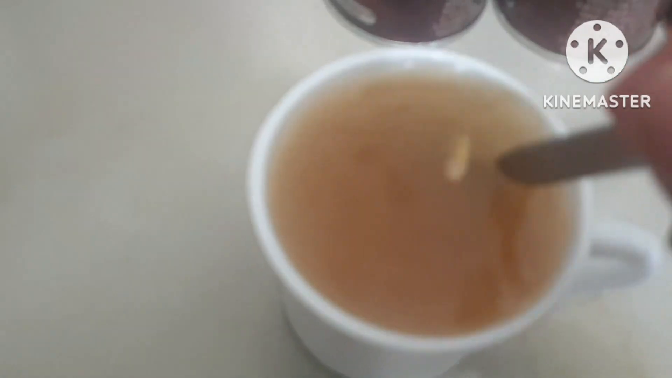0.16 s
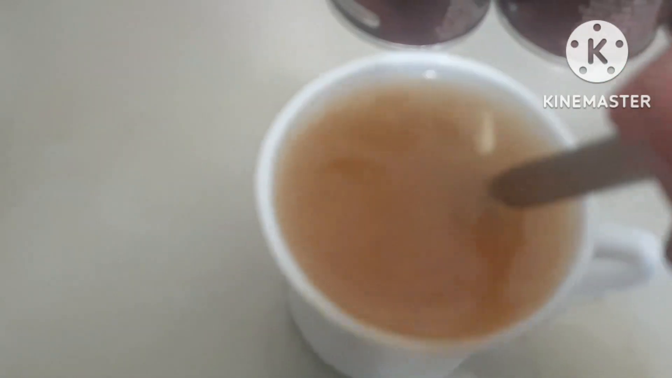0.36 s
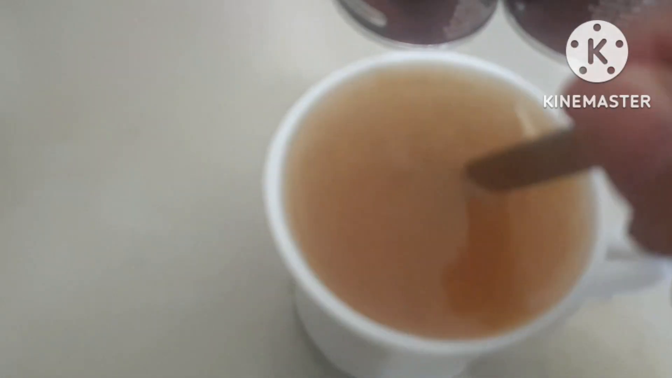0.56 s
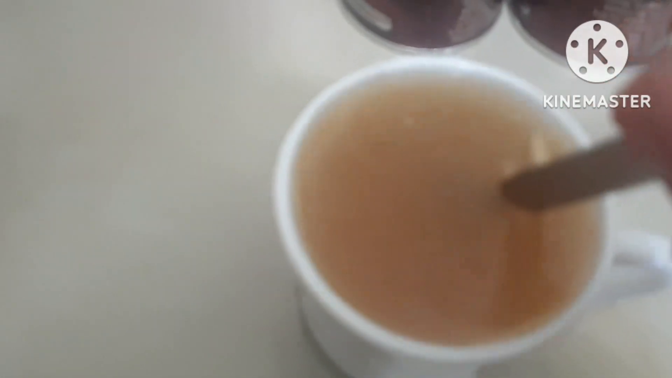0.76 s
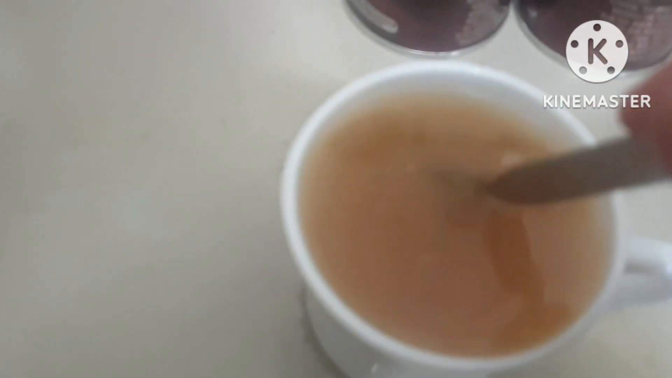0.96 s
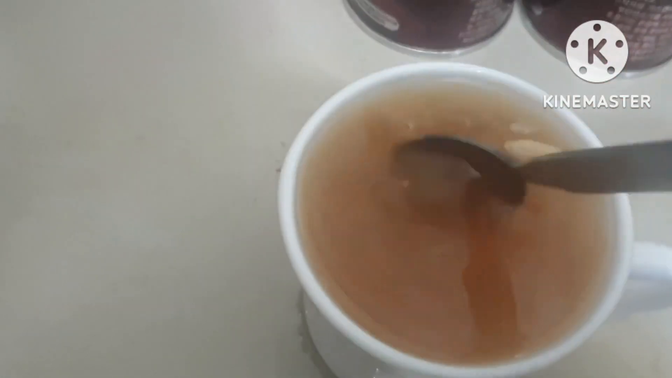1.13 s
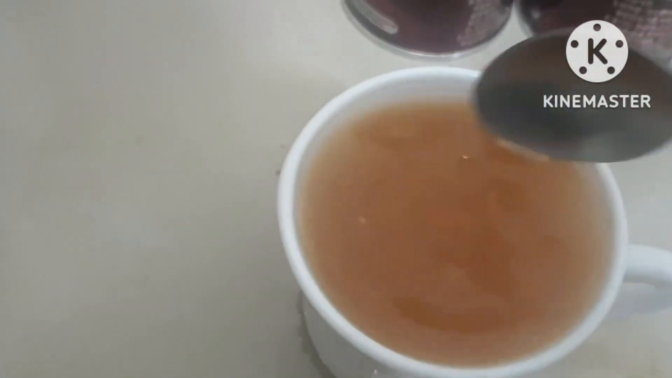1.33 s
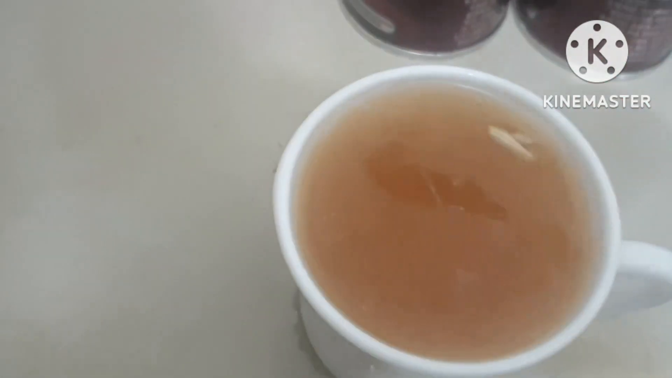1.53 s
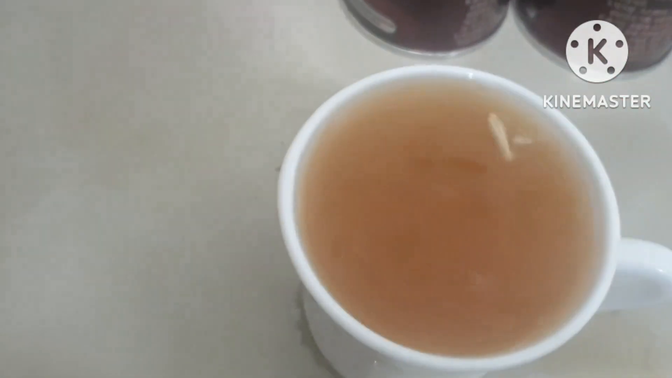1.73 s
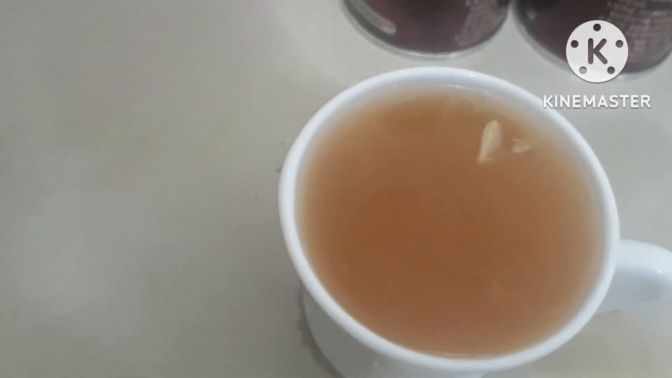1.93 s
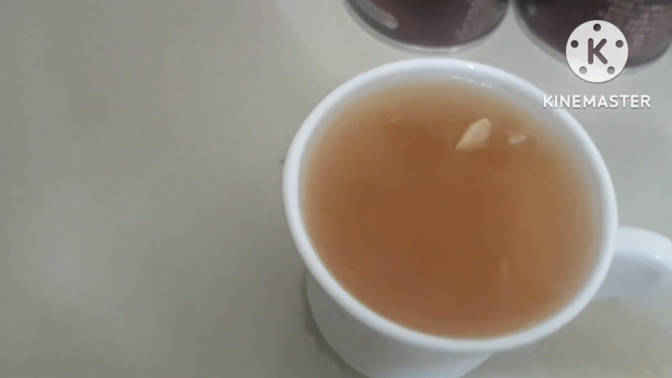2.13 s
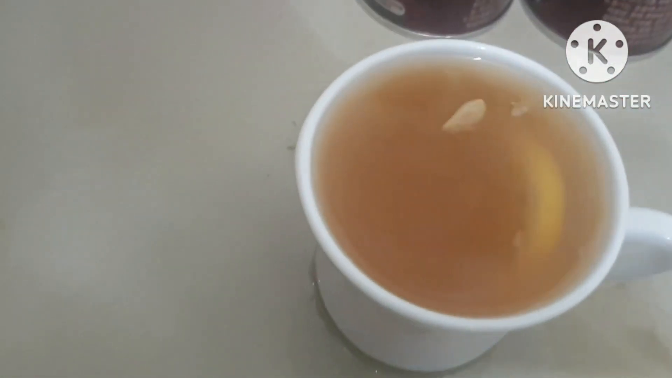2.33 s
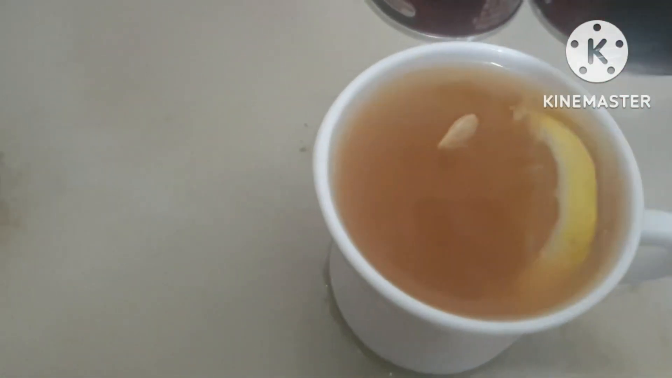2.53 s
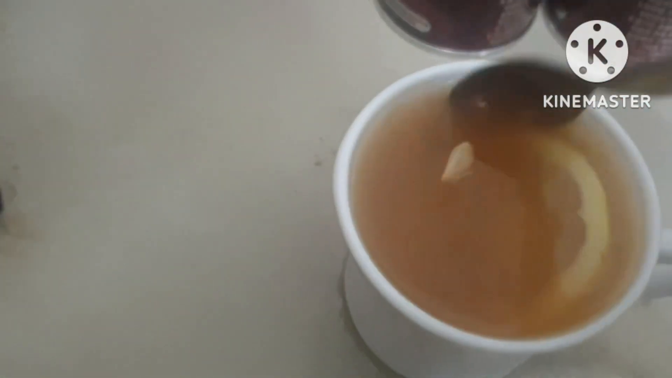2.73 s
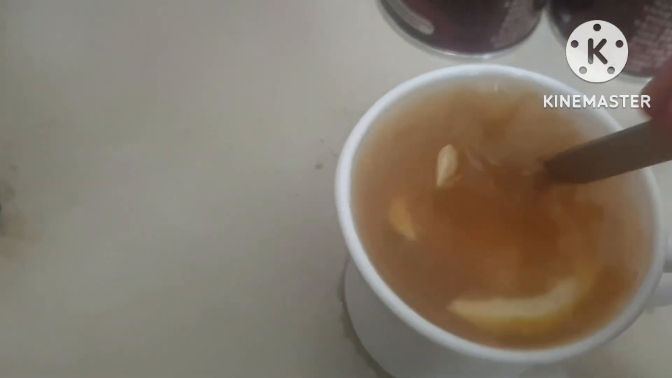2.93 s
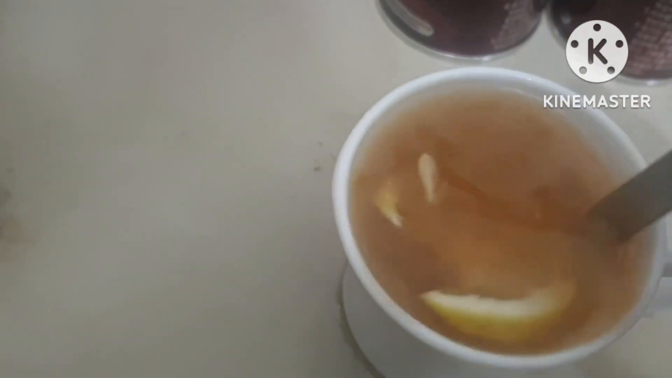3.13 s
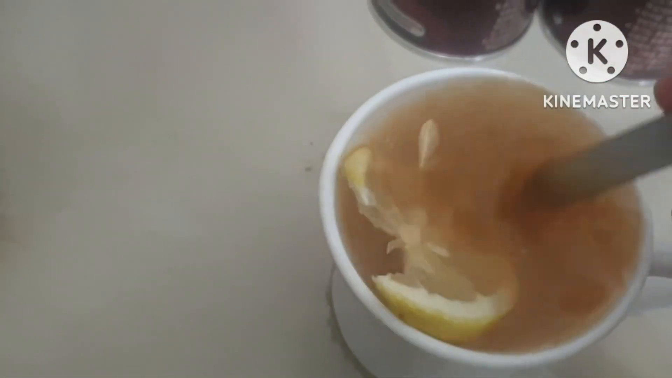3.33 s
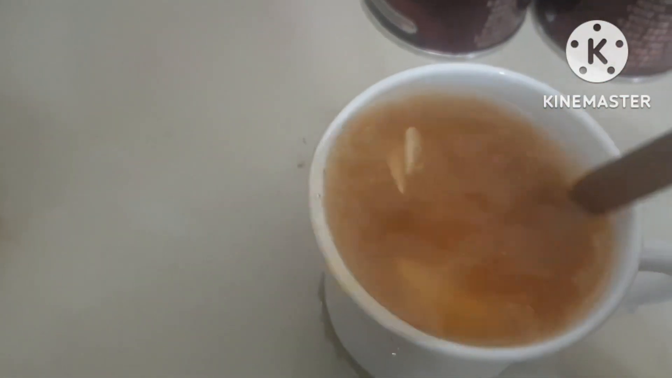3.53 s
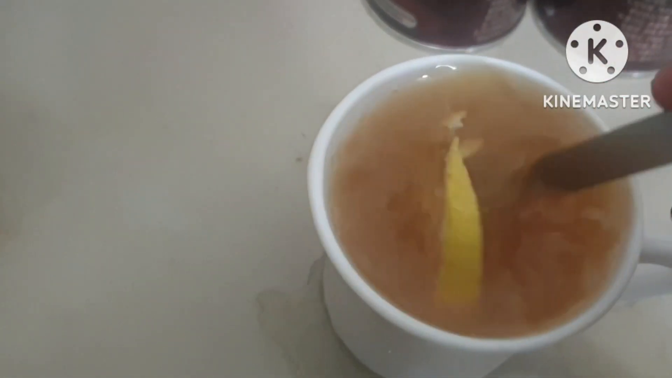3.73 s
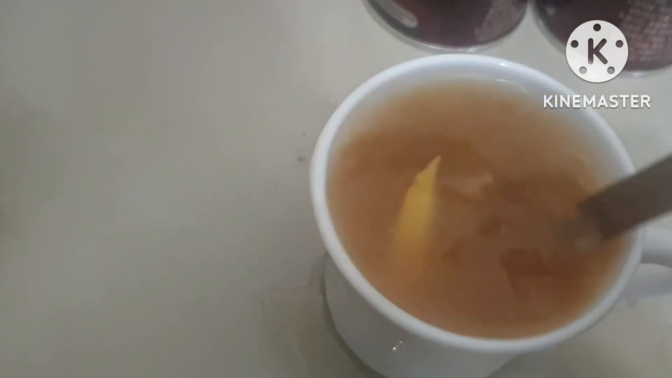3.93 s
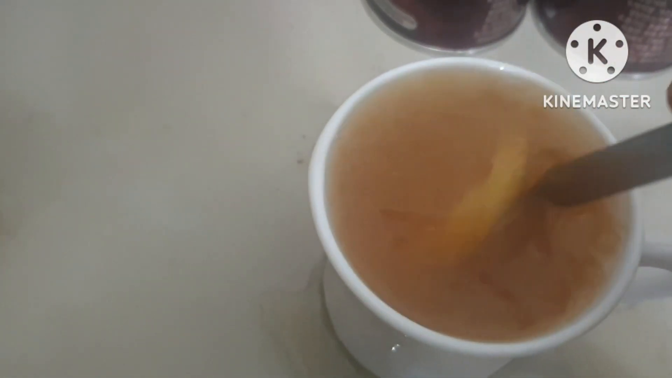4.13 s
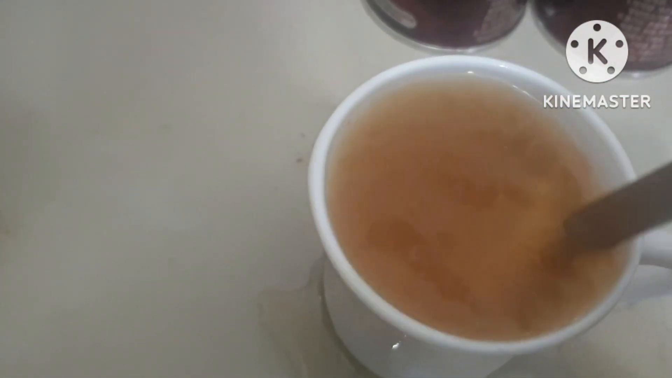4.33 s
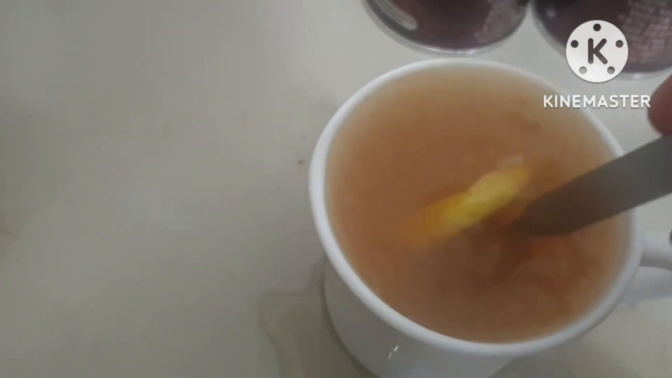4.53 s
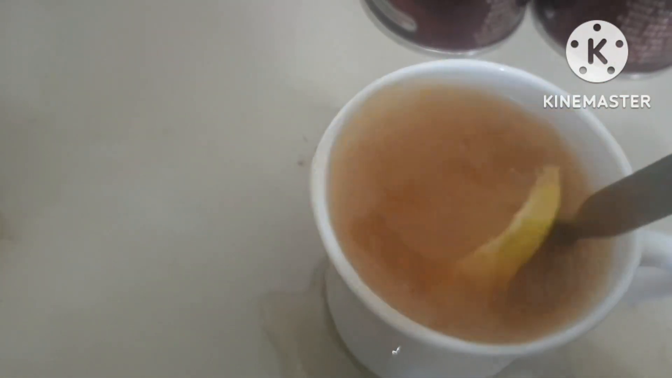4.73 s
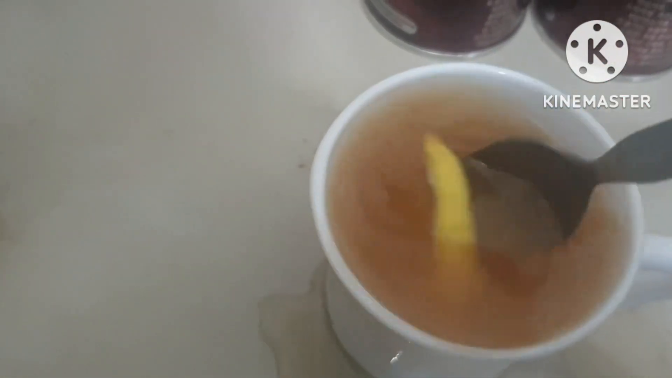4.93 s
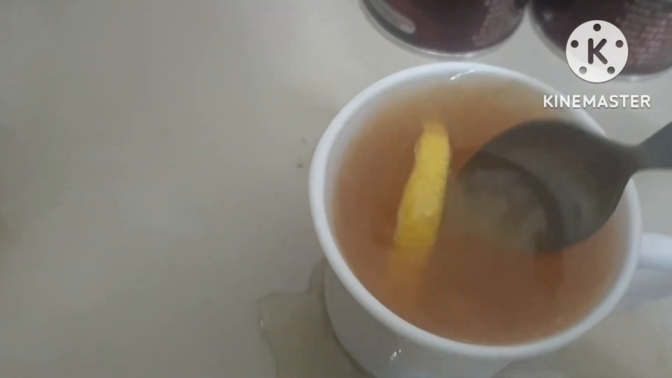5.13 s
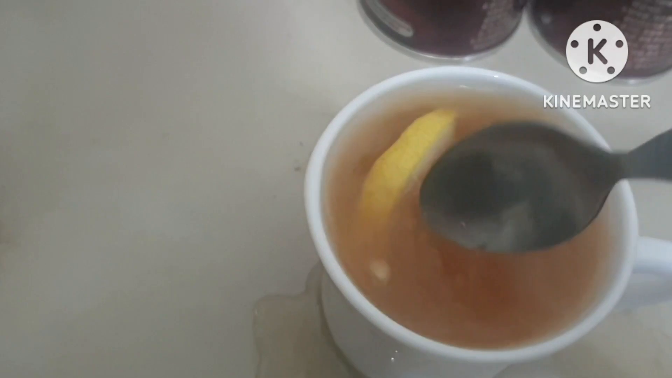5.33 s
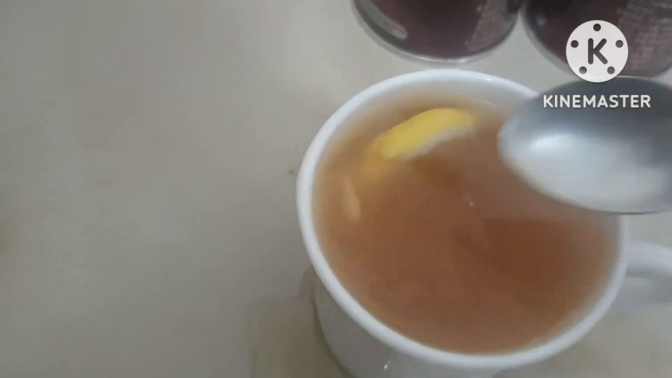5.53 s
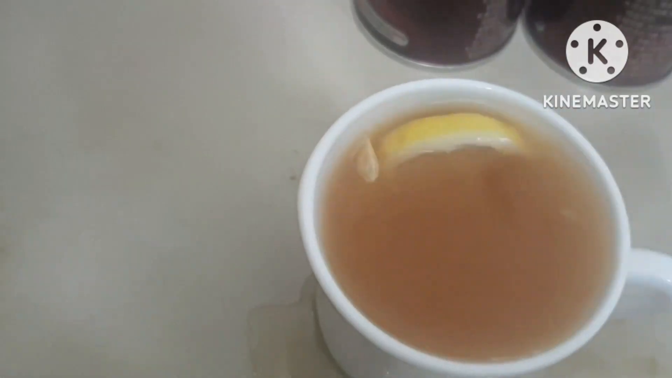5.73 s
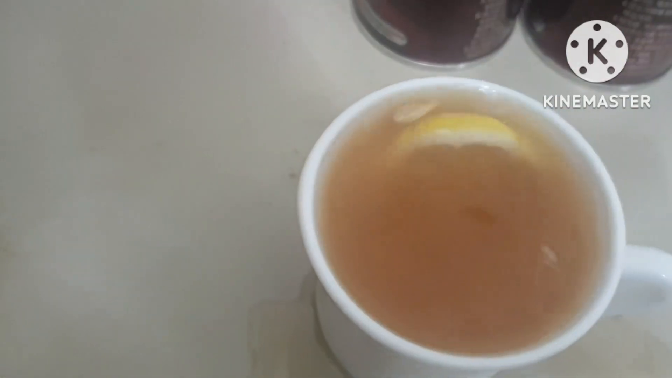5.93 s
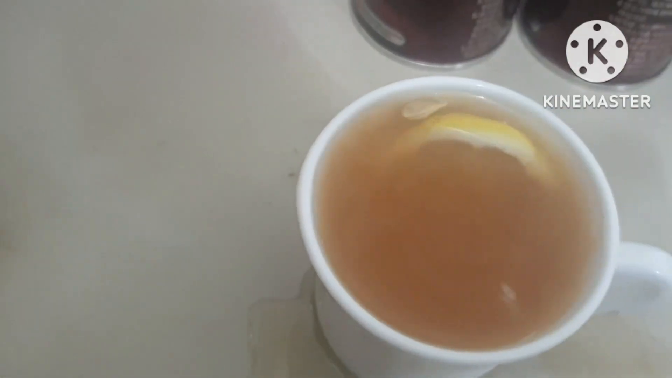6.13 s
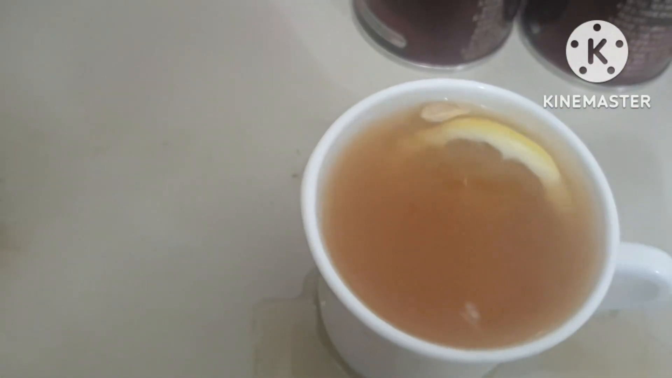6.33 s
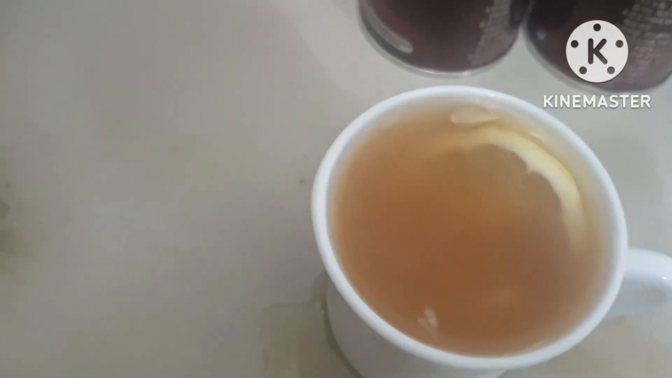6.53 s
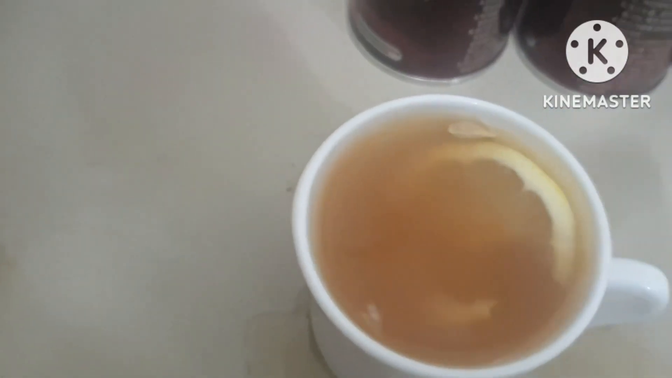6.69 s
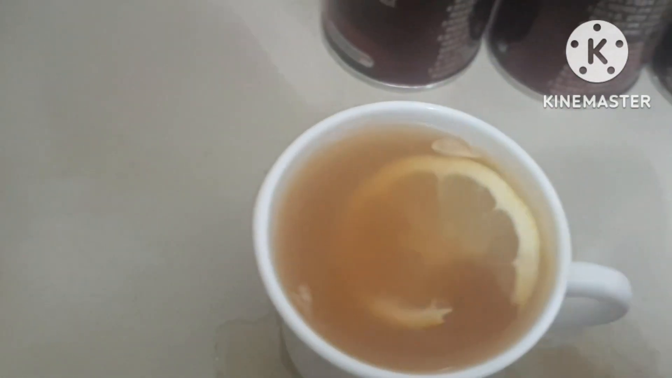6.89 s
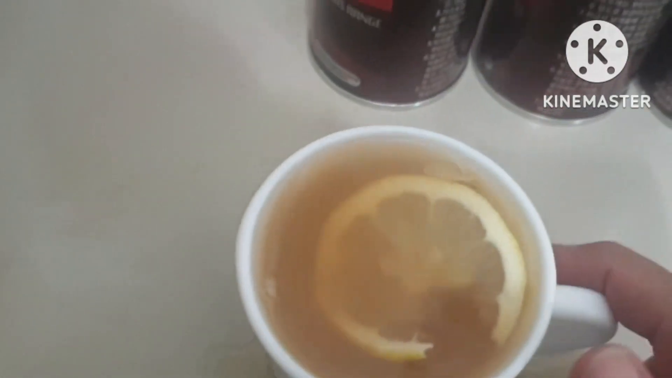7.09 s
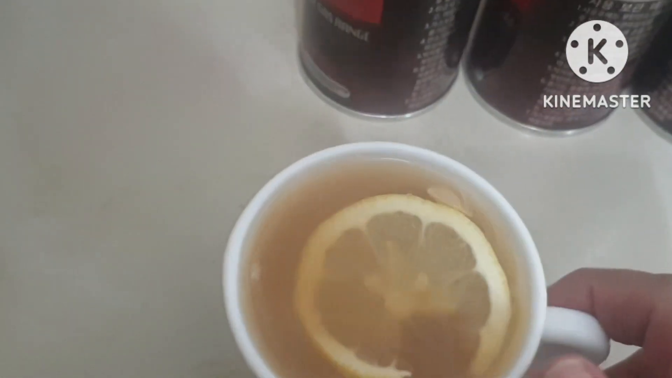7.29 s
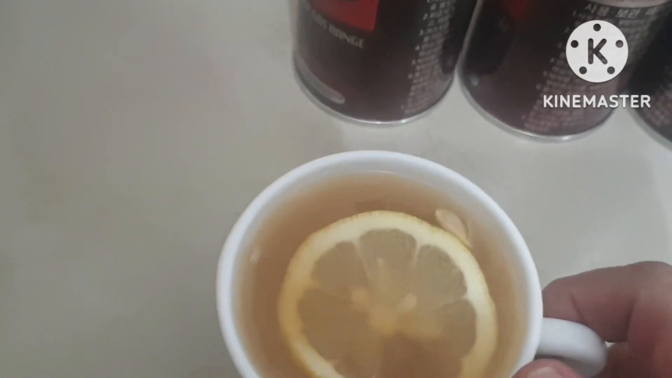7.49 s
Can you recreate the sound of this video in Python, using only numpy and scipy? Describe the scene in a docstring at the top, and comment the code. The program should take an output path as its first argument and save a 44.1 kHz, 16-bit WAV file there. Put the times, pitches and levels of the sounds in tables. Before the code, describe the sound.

A quiet small kitchen with a low wavering fridge hum and faint air hiss, heard by a close phone, brighter on the left. At 0.04 s a teaspoon gives a loud, hard clink on a full ceramic mug, then a much weaker one at 0.24. Near-silence follows, with barely audible soft swells around 1.1 and 1.4. Strong clinks return at 2.8 and 3.0, then uneven stirring: light at 3.1, faint ticks, firmer at 3.46, 3.85 and 3.95, one at 4.4, and a bright double hit at 4.72. Tiny ticks come at 5.4 to 5.65. At 6.14 the spoon is laid on the counter with a crisp double tap. At 6.54 it drops: four very fast loud metallic bounces, then a high rattle rocking weaker until about 6.96. Two dull finger knocks on the handle, very faint at 7.24 and clearer at 7.43, close the quieter background. Echoes are short and dense.

```python
"""A steel teaspoon clinks against a full ceramic mug, then is laid on the counter, drops and rocks to rest.
Every blow is a gritty crack of contact, a fading buzz and a bank of decaying sine modes.
Two soft finger knocks follow on the handle, and dense echoes place it all in a small hard kitchen.
Beneath lie a wavering fridge hum of sines, filtered-noise air and three soft swells of narrow noise.
Two ports of a close phone pick it up: the left faces the mug, the right is duller."""
import sys
import numpy as np
from scipy import signal
from scipy.fft import rfft, irfft
from scipy.io import wavfile
from scipy.ndimage import uniform_filter1d

SR = 44100
rng = np.random.default_rng(int(sys.argv[2]) if len(sys.argv) > 2 else 0)


def store_wav(level_fs):
    """Save 16-bit WAV to argv[1]."""
    pcm = np.round(np.clip(np.atleast_2d(level_fs), -1, 1) * 32767)
    wavfile.write(sys.argv[1], SR, pcm.T.astype(np.int16))


N = 337600

# background level over time: (time [s], level [dB])
ROOM_LEVEL = [(0.0, -52), (1.2, -51), (1.7, -52.5), (3.4, -52), (3.84, -54.5), (5.95, -51), (6.6, -56),
              (7.12, -58.5), (7.66, -59)]
# fridge partials: (frequency [Hz], level beside the background [dB])
FRIDGE_PARTIALS = [(53.2, -2), (100.5, -5), (159.4, -6), (212.5, -7.5), (264, -14.5), (319, -9.5),
                   (372, -13.5), (479, -40), (532, -23.5)]
# spectral shape of the air: (frequency [Hz], relative density [dB per Hz])
AIR_SHAPE = [(30, -5), (62, -6.5), (165, -17), (330, -11.5), (600, -25.5), (850, -21.5), (1470, -27.5),
             (2200, -26.5), (3400, -33), (4500, -28.5), (6500, -29.5), (7800, -34), (10000, -30.5),
             (12800, -39), (15000, -46), (16000, -70)]
# how alike the air is at both ports: (frequency [Hz], correlation [0-1])
AIR_LIKENESS = [(300, 0.88), (640, 0.58), (1300, 0.016)]
# brief soft background swells: (time [s], length [s], centre [Hz], half width [Hz], level [dB])
SOFT_SWELLS = [(1.07, 0.072, 766, 90, -59), (1.384, 0.12, 70.5, 34.8, -49.5),
               (1.386, 0.014, 530, 40, -57.5)]
# echo bands of the hard walls: (frequency [Hz], level [dB], t60 [s])
ECHO_BANDS = [(501, 4, 0.48), (1470, -1.5, 0.31), (4000, -11, 0.3), (6315, -8, 0.36), (8890, -8, 0.18),
              (12620, -6, 0.37)]
# treble and bass lost at the right port, negative is gain: (frequency [Hz], loss [dB])
RIGHT_PORT_LOSS = [(60, 4.5), (110, 4.5), (200, 3.5), (380, -0.5), (700, 0.5), (1290, 7), (2380, 11),
                   (4400, 8.5), (8120, 13.5), (15000, 7)]
# fingers on the handle: (time [s], level [dB], frequency [Hz], t60 [s])
HANDLE_TAPS = [(7.242, -59, 583, 0.0493), (7.428, -45, 803, 0.036)]

# centres of the spoon's colour bands: (frequency [Hz])
SPOON_BAND_HZ = (2200, 3100, 4200, 5400, 6500, 8700, 9700, 11300, 12900)
# pitches of the dry spoon: (frequency [Hz])
SPOON_MODE_HZ = (2090, 2235, 3435, 4172, 4800, 5183, 5520, 5755, 6387, 6790, 7850, 8736, 9723, 11250, 12757,
                 13400)
# dry spoon modes in the order of those pitches, before colour and ring length: (level [dB], t60 [s])
SPOON_MODES = [(-2.5, 0.11), (-1, 0.24), (-13, 0.14), (-10, 0.14), (-18, 0.093), (-6.5, 0.2), (-15, 0.083),
               (-9.5, 0.194), (4, 0.12), (-8.5, 0.12), (-32, .08), (1, 0.16), (0.5, 0.11), (1, 0.24),
               (5.5, 0.086), (-13, .1)]
# spoon let go, bouncing, then rocking strong-weak at shrinking gaps: (time [s], level [dB],
# then offsets of the notes near 5.4, 6.4, 8.7, 9.7, 11.3 and 12.8 kHz [dB])
DROP_EVENTS = [(6.54, -7.5, 2, 4, -6, 2, -2, 4.5), (6.5486, -9, 4, 4.5, -3, 4, -13, -19),
               (6.557, -5.5, -4, 9, 6, 11, -12, -31), (6.566, -10, 3, -5.5, 2, -2, -2, -26),
               (6.601, -15, 14, -4, -22, -3, -10, 13.5), (6.6224, -24, 2, -7, -12, -1, -5.5, 8),
               (6.6346, -25, -2, -3, -9, 3, -4, 8), (6.6524, -23.5, -2, -2, -1, 0, -5, -3),
               (6.681, -23.5, 7.5, -4, -6, 2.5, -3, 6), (6.6986, -35, -8, 2, 0, 0, -8, 9),
               (6.7055, -28, 2, -11, -4, -5, -10, 5), (6.738, -35, 0, 0, 0, 0, -10, 6),
               (6.7446, -34.5, 0, 2, 14, 0, -12, 4), (6.748, -35, 2, -8, 2, -5, -8, 10),
               (6.782, -42, 0, -2, 0, 0, -2, 14), (6.82, -39, 4, -3, -2, 0, 5, -2),
               (6.8258, -45, 0, -2, -7, -2, 0, 3), (6.8595, -48, 0, 3, -12, -2, 0, 5),
               (6.893, -42.5, 6, 2, -11, 0, 15, -3), (6.929, -54, 3, 4, -4.5, -1.5, 4, -7),
               (6.958, -44, 1.5, 7, -10, -3, 19.5, -6)]
# colour shared by all drops, one value per spoon band: (level [dB])
DROP_COLOUR = (-34.5, -41.5, -20, -17.5, -14.5, -12.5, -8, -16.5, -10)
# harder drops throw the spoon clear, so it rings more:
# (drop level [dB], ring share [0-1], ring length [factor])
DROP_FLIGHT = [(-43, 0.27, 0.53), (-27.5, 0.53, 0.21), (-21, 0.54, 0.93), (-7, 0.85, 0.89)]

# spoon still held, laid on the counter: (time [s], level [dB])
LAID_EVENTS = [(6.1443, -9), (6.1563, -17.5)]
# colour of both laid touches, one value per spoon band: (level [dB])
LAID_TINT = (-38, -33.5, -30, -26.5, -22, -15, -14, -20, -29.5)
# worktop under the held spoon, before colour and ring length: (frequency [Hz], level [dB], t60 [s])
WORKTOP_MODES = [(589, -11, 0.0235), (1250, -12.5, .03), (2038, 7, 0.22), (2480, -5, 0.17), (3270, 4, 0.22),
                 (4200, 0, .12), (4760, 8, 0.099), (6170, 10, 0.055), (7290, -14, 0.03), (8700, 4, .08),
                 (9900, 11.5, 0.045), (12300, 4.5, 0.1), (13460, -6.5, 0.039)]

# centres of the mug's colour bands: (frequency [Hz])
MUG_BAND_HZ = (500, 1650, 3100, 4200, 6100, 7200, 9100, 12800, 10500)
# fixed pitches of the mug: (frequency [Hz])
MUG_MODE_HZ = (380, 620, 860, 1130, 1690, 2300, 2750, 3080, 3500, 4090, 4650, 6130, 7120, 8150, 9040, 9260,
               9400, 10100, 10900, 11750, 12180, 13200, 14200)
# mug modes in the order of those pitches, before colour and ring length: (level [dB], t60 [s])
MUG_MODES = [(16.5, 0.15), (11.5, 0.2), (-0.5, 0.14), (-8, .12), (-6.5, 0.1), (-10, .08), (-6, 0.06),
             (-1.5, 0.06), (-12, 0.03), (-11.5, .045), (-20.5, 0.044), (-7.5, 0.1), (-8.5, 0.1),
             (-3.5, .02), (4, .025), (-4.5, 0.078), (-4, 0.06), (-3, .04), (-2.5, 0.026), (-2.5, 0.046),
             (-4.5, 0.047), (-6.5, 0.023), (-12, .025)]
# low, middle and high note that shift with the place struck and the depth of the spoon,
# before colour and ring length: (level [dB], t60 [s])
SHIFTING_NOTES = [(0, 0.086), (0, 0.022), (2, 0.015)]
# spoon on mug: (time [s], level [dB], contact [ms], ring share [0-1], ring length [factor],
# low, middle and high note [Hz], then offsets from the shared colour: thud [dB], low note [dB],
# wall near 3 kHz [dB], middle note [dB], rim near 6, 7, 9 and 13 kHz [dB])
CLINK_EVENTS = [(0.0449, -7.5, 1.1, 0.35, 0.79, 1653, 3936, 5370, -32, 5.5, 7.5, 7, 1, 7, -6, 4),
                (0.2426, -24, 0.98, 0.4, 0.42, 1900, 3910, 5570, -8, 2.5, -23, 8, -1, 0, 4, -3),
                (2.7892, -6, 1.72, 0.29, 0.6, 1910, 4674, 6060, -12.5, 5.5, 2, -5, 10, 6, 7, 2),
                (2.981, -6.5, 1.43, 0.26, 1, 1623, 4054, 7350, 1, 9.5, 7, 3, 1, 3.5, 0.5, 0.5),
                (3.094, -20.5, 2.3, 0.24, 0.5, 1730, 4070, 5580, -8, 5, -4, 4.5, -8, 2, -5.5, 3.5),
                (3.216, -41.5, 1.1, 0.16, 0.7, 2000, 4350, 5800, -3, 27, 19, 5, -15, -10, 3, 3),
                (3.303, -43, 1.4, 0.19, 0.55, 2190, 3800, 6560, 14, 30, 13, -12, -10, -6, 6, 0),
                (3.39, -46.5, .7, .25, .8, 2000, 4670, 5800, 13, 0, -6, -16, -7, -5, -4, 0),
                (3.456, -16.5, 1.55, 0.45, 0.7, 2220, 4060, 7920, -16, 7, 4.5, 0.5, 3, 2, -0.5, -1),
                (3.521, -34.5, 0.4, 0.23, 0.77, 1760, 4200, 5540, 6, 10, -5, 5, 8, 3, -2, 2),
                (3.5514, -32, 2.6, 0.19, 0.86, 1850, 4020, 7600, 8, 20.5, 18, 8, 3, 5, -2, 2),
                (3.633, -47.5, 1.6, 0.3, 1, 1520, 4120, 5640, -3, -13, -13.5, -21, -8, -3, 3, 0),
                (3.7973, -25, 2.1, 0.14, 0.65, 2020, 4360, 5600, 8, 14, 11, 5.5, 9, -1, -1.5, 2),
                (3.853, -17.5, 1.66, 0.4, 0.8, 1740, 4250, 7030, -20, 3.5, 3, -6, 9, 3, 5, 3),
                (3.949, -17, 0.77, 0.27, 1, 1694, 4070, 5610, -13.5, 8, 1, -1, -1, -4, -4, 0),
                (4.212, -48, 1.07, 0.37, 0.74, 1815, 4170, 6640, 0, -16, -13, -17, 2.5, 1.5, -6, -1),
                (4.3765, -19, 1.64, 0.29, 0.56, 1920, 4200, 5710, -27, 9, -8, -5, -2.5, -3, 0, -0.5),
                (4.721, -11.5, 1.1, 0.61, 0.64, 1890, 4140, 3060, -37, 8, 0.5, -3.5, -5, -10, 1, 4),
                (4.7293, -20.5, 0.88, 0.47, 1, 1810, 4200, 8150, -17, 7, 6, -7, -12.5, -2, -2, -4),
                (5.4375, -53, 1.5, 0.52, .8, 1870, 4700, 6500, 5, 1, 2, -12, 0, 0, -6, 0),
                (5.5904, -52, 1.4, .3, 0.63, 1650, 4800, 5850, 5, 2, -5, -5, 4, 0, -11, 2),
                (5.643, -39, 0.82, 0.29, 1, 1610, 4700, 5470, 14, 6, -12, -3, 11, 6, -6, -6)]
# colour shared by all clinks, one value per mug band: (level [dB])
CLINK_COLOUR = (-41.5, -23.5, -22, -2.5, -17, -15, -7.5, -12.5, -13.5)


def undb(db):
    """Turn decibels into an amplitude factor."""
    return 10 ** (np.asarray(db) / 20)


def on_log(hz, table, column=1):
    """Read a table along a log-frequency axis."""
    table = np.array(table, float)
    return np.interp(np.log(np.maximum(hz, 1)), np.log(table[:, 0]), table[:, column])


def colour(x, gain):
    """Apply a gain given as a function of frequency."""
    return irfft(rfft(x) * gain(np.fft.rfftfreq(x.shape[-1], 1 / SR)), x.shape[-1])


def fade(t, t60):
    """Exponential decay that loses 60 dB in t60 seconds."""
    return np.exp(-np.log(1000) * t / t60)


def unit(x):
    """Scale a stereo sound to a left peak of one."""
    return x / np.abs(x[0]).max()


def add(out, s, sound):
    """Mix a sound in at s seconds, cut at the end of the scene."""
    i = int(s * SR)
    out[..., i:i + sound.shape[-1]] += sound[..., :N - i]


def walk(rate):
    """Random levels held for 1 / rate seconds and smoothed twice; spread near 1."""
    hold = int(SR / rate)
    steps = np.repeat(rng.standard_normal(N // hold + 1), hold)
    return 1.33 * uniform_filter1d(uniform_filter1d(steps, hold), hold)[:N]


def air():
    """Low rumble largely shared by both ports, with smooth hiss that is not."""
    left, other = rng.standard_normal((2, N))
    like = lambda f: np.clip(on_log(f, AIR_LIKENESS), 0, .99)
    right = colour(left, like) + colour(other, lambda f: np.sqrt(1 - like(f) ** 2))
    both = colour(np.array([left, right]), lambda f: undb(on_log(f, AIR_SHAPE)))
    return both / both[0].std()


def fridge():
    """Compressor orders and mains hum, each wavering in level and a little in pitch."""
    t, out = np.arange(N) / SR, 0
    for hz, db in FRIDGE_PARTIALS:
        level = undb(db + 3.1 * walk(9.4))
        out = out + level * np.sin(2 * np.pi * hz * t + 0.5 * walk(9.8))
    return out


def swells():
    """Narrow bands of noise that rise and fall in a bell curve."""
    t, out = np.arange(N) / SR, 0
    for s, length, hz, width_hz, db in SOFT_SWELLS:
        band = colour(rng.standard_normal(N), lambda f: 1 / (1 + ((f - hz) / width_hz) ** 2))
        out = out + undb(db) * band / band.std() * np.exp(-((t - s) / length) ** 2)
    return out


def kitchen(x):
    """Dense echoes of hard walls, each band dying at its own pace, unrelated at the two ports."""
    t, tail = np.arange(SR // 2) / SR, 0
    for k, (hz, db, t60) in enumerate(ECHO_BANDS):
        share = [(row[0], j == k) for j, row in enumerate(ECHO_BANDS)]  # crossfades to its neighbours
        band = colour(rng.standard_normal((2, len(t))), lambda f: np.sqrt(on_log(f, share)))
        tail = tail + undb(db) * band * fade(t, t60) / np.sqrt(t60 * SR / 14)
    tail = tail * np.clip(t / 0.0042, 0, 1)  # echoes build up over 4.2 ms
    return signal.fftconvolve(x[None], tail, axes=1)[:, :N]


def ports(x, lead_ms, shadow_db):
    """Double the sound; shift the right port earlier by lead_ms and set its level for the phone's shadow."""
    right = undb(shadow_db) * np.roll(x[1], -int(lead_ms * SR / 1000))
    return 2 * np.array([x[0], right])


def taps():
    """Dull short knocks of a finger on ceramic, each one swelling and decaying sine."""
    out, t = np.zeros(N), np.arange(SR // 8) / SR
    for s, db, hz, t60 in HANDLE_TAPS:
        swell = 1 - fade(t, 0.011)
        add(out, s, undb(db) * swell * fade(t, t60) * np.sin(2 * np.pi * hz * t))
    return out


def contact(t, hz, gain, swing, contact_ms, grit, width_hz, contrast, crack_hz,
            buzz_db, buzz_t60, buzz_contrast, buzz_tilt_db):
    """Crack while the parts touch, the modes heavily damped and mixed with grit; then a loose buzz."""
    bright = lambda f: f ** 2 / (f ** 2 + crack_hz ** 2)  # a brief touch moves little air in the bass
    # broad peaks at the modes; a contrast below 1 evens out their strength
    peaks = lambda f, power: np.sum(gain ** power / (1 + ((f - hz) / width_hz) ** 2), axis=0)
    hiss = colour(rng.standard_normal((2, len(t))), lambda f: peaks(f, contrast) * bright(f))
    damped = np.sum(gain ** contrast * bright(hz) * swing, axis=1)
    touch = grit * hiss / hiss.std() + (1 - grit) * damped / damped.std()
    push = t / (contact_ms / 1000)
    press = push * np.exp((1 - (push / 1.366) ** 2) / 2)  # pressure rises, then lets go

    def buzz_gain(f):
        tilt = undb(buzz_tilt_db * np.log2((f + 300) / 4000))  # dB per octave
        return peaks(f, buzz_contrast) * tilt / (1 + (320 / (f + 1)) ** 4)

    buzz = colour(rng.standard_normal((2, len(t))), buzz_gain)
    return touch * press + undb(buzz_db) * fade(t, buzz_t60) * buzz / buzz.std()


def blows(events, bands, modes, detune, flutter, stray, swell_ms, choke_db=0, notes=(), in_step=False,
          **contact_settings):
    """Each blow, for both ports: the crack and buzz of contact mixed with the modes of the object."""
    out, t = np.zeros((2, N)), np.arange(SR // 4) / SR
    starts = np.array(events)[:, 0]
    for s, db, contact_ms, ring, length, *rest in events:
        own = [(f, *note) for f, note in zip(rest, notes)]
        hz, mode_db, t60 = np.array(own + modes)[:, :, None].transpose(1, 0, 2)
        tint = sorted(zip(bands, rest[len(notes):]))
        gain = undb(mode_db + on_log(hz, tint))
        luck = rng.standard_normal((3, len(hz), 1))
        # a changing load makes every mode flutter in strength
        wobble = 15 * uniform_filter1d(rng.standard_normal((len(hz), len(t))), size=220)
        load = 1 + flutter * wobble
        phase = 2 * np.pi * hz * (1 + detune * luck[0]) * t + 3 * luck[1]
        if in_step:  # a body that still rings carries its swing on through the next touch
            phase = 2 * np.pi * hz * (s + t) + hz + .4 * luck[1]
        swing = np.sin([phase, phase + stray * luck[2]])  # each mode reaches the right port by its own path
        modal = np.sum(gain * load * fade(t, t60 * length) * swing, axis=1)
        modal *= 1 - np.exp(-t * 1000 / swell_ms)
        # every later touch takes away part of the ring
        touches = np.searchsorted(starts, s + t) - np.searchsorted(starts, s, "right")
        modal *= undb(-choke_db * uniform_filter1d(np.maximum(touches, 0.), size=60))
        crack = contact(t, hz, gain, swing, contact_ms, **contact_settings)
        add(out, s, undb(db) * unit(ring * unit(modal) + (1 - ring) * unit(crack)))
    return out


def loose_spoon():
    """Dropped spoon: its own modes ring on from touch to touch, more after a hard drop, choked by each touch."""
    table = np.array(DROP_EVENTS)
    tint = 1.5 * rng.standard_normal((len(table), len(SPOON_BAND_HZ)))  # chance, dB
    tint[:, 3:] += table[:, 2:]
    flight_db, *laws = np.transpose(DROP_FLIGHT)
    ring, length = (np.interp(table[:, 1], flight_db, law) for law in laws)
    contact_ms = np.full(len(table), 0.67)
    events = np.column_stack([table[:, :2], contact_ms, ring, length, DROP_COLOUR + tint])
    modes = [(hz, *mode) for hz, mode in zip(SPOON_MODE_HZ, SPOON_MODES)]
    return blows(events, SPOON_BAND_HZ, modes, detune=0, flutter=0.4, stray=0.68, swell_ms=1.65,
                 choke_db=8.5, in_step=True, grit=0.92, width_hz=780, contrast=.8, crack_hz=4500,
                 buzz_db=-6, buzz_t60=0.092, buzz_contrast=0.6, buzz_tilt_db=0.0)


def laid_spoon():
    """Held spoon laid on the counter: a very short gritty contact excites the worktop modes."""
    contact_ms, ring, length = 0.31, 0.38, 0.73
    events = [(*row, contact_ms, ring, length, *LAID_TINT) for row in LAID_EVENTS]
    return blows(events, SPOON_BAND_HZ, WORKTOP_MODES, detune=0.0051, flutter=1.7, stray=0.89,
                 swell_ms=0.301, grit=0.81, width_hz=870, contrast=1, crack_hz=700,
                 buzz_db=-16.5, buzz_t60=0.27, buzz_contrast=0.75, buzz_tilt_db=0.5)


def mug_clinks():
    """Spoon on the full mug: fixed mug modes plus three notes that shift, coloured anew at every clink."""
    table = np.array(CLINK_EVENTS)
    tint = 1.5 * rng.standard_normal((len(table), len(MUG_BAND_HZ)))  # chance, dB
    tint[:, :8] += table[:, -8:]  # the row moves all bands but the last
    events = np.hstack([table[:, :-8], CLINK_COLOUR + tint])
    modes = [(hz, *mode) for hz, mode in zip(MUG_MODE_HZ, MUG_MODES)]
    return blows(events, MUG_BAND_HZ, modes, detune=0.0029, flutter=0.55, stray=0.72, swell_ms=0.79,
                 notes=SHIFTING_NOTES, grit=0.49, width_hz=320, contrast=.95, crack_hz=1100,
                 buzz_db=-14, buzz_t60=0.11, buzz_contrast=.7, buzz_tilt_db=0.5)


def scene():
    """Mix the spoon sounds and their echoes over the background."""
    mug, laid, loose = mug_clinks(), laid_spoon(), loose_spoon()
    direct = ports(mug, lead_ms=0, shadow_db=-6.0)
    direct += ports(laid, lead_ms=-.15, shadow_db=1.5)
    direct += ports(loose, lead_ms=0.34, shadow_db=-3.5)
    direct += taps() + swells()
    echoes = kitchen((mug + laid + loose)[0])
    level_db = np.interp(np.arange(N) / SR, *np.transpose(ROOM_LEVEL))
    background = undb(level_db) * (fridge() + undb(-0.5) * air())
    return direct + echoes + background


def record(dry):
    """Dull the right port, filter out deep bass, round the peaks and cut the top."""
    right = colour(dry[1], lambda f: undb(-on_log(f, RIGHT_PORT_LOSS)))
    bass_cut = signal.butter(4, 42., "highpass", fs=SR, output="sos")
    top_cut = signal.ellip(10, .2, 80, 16500, fs=SR, output="sos")
    both = signal.sosfilt(bass_cut, [dry[0], right])
    return signal.sosfilt(top_cut, np.tanh(both))


dry = scene()
out = record(dry)
store_wav(out)
```